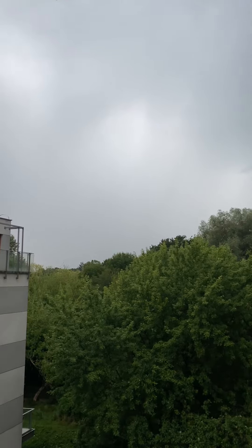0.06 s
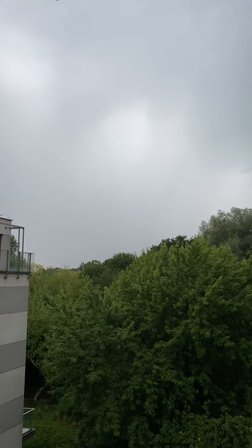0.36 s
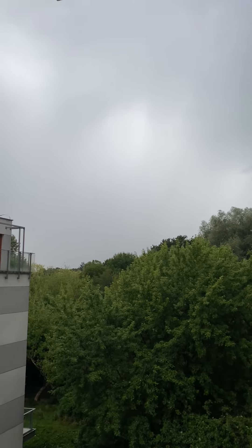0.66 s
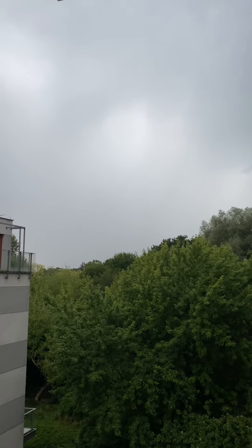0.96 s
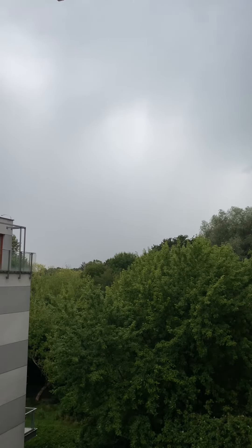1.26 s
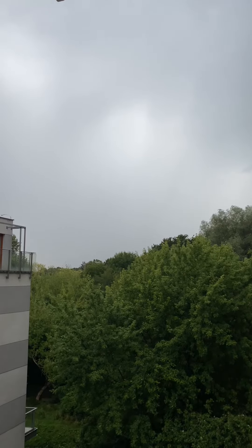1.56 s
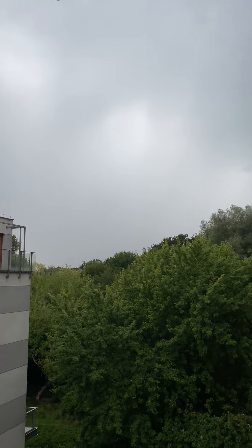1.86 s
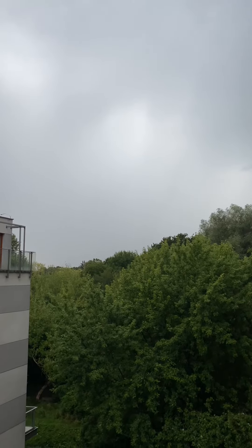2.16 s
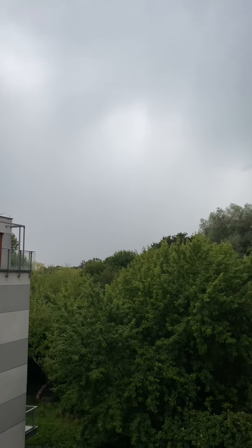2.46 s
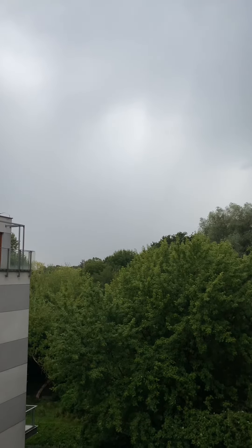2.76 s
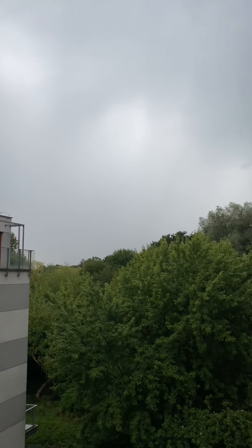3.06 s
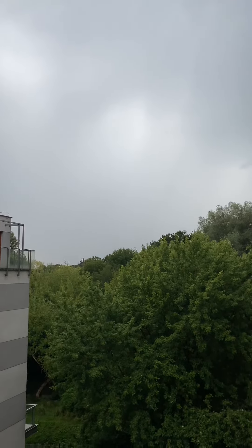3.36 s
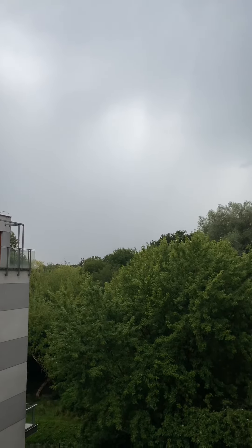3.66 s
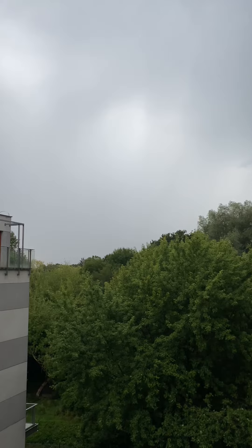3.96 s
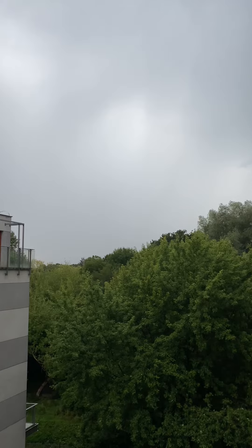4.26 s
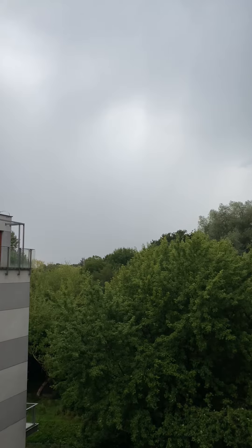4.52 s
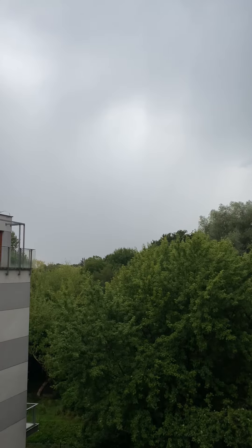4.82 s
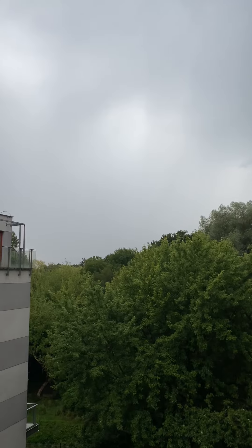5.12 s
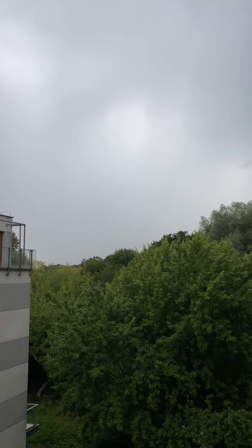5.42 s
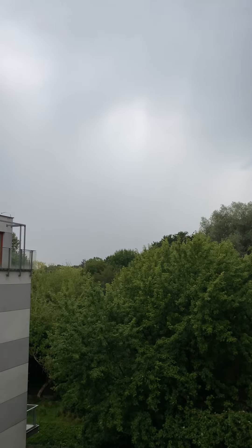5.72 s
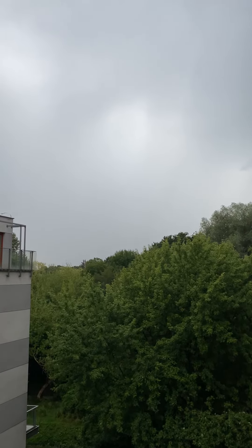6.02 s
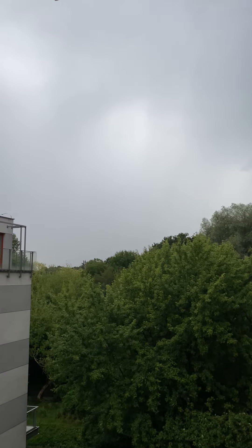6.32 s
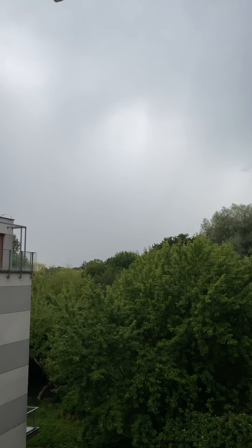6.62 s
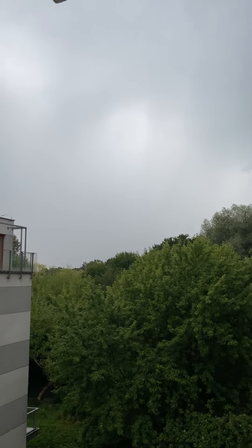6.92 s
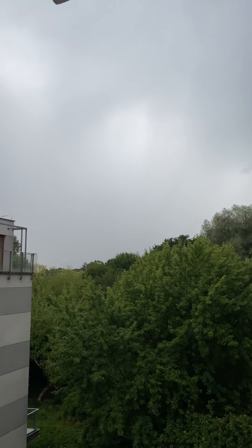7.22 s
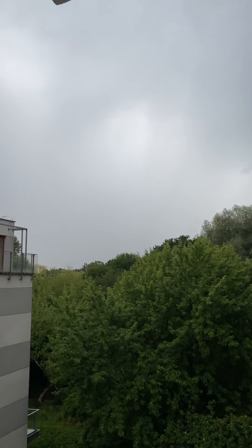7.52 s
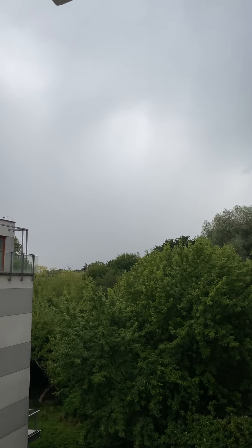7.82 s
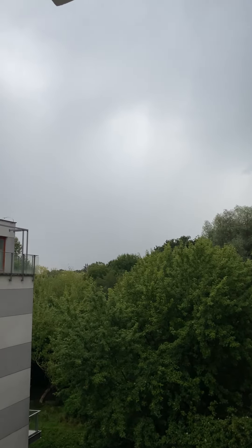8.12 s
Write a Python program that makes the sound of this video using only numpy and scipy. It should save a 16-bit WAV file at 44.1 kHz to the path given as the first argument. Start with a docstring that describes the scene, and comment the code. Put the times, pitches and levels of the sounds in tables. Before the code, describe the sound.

Thunder begins with a tearing crackle and builds in uneven claps to a loud, booming peal. It sinks to a low rumble, then swells again with duller booms. Light rain hisses steadily in the trees underneath, with a few faint drops ticking close by and one dry click just after the peak. The sound is heard outdoors from a balcony over a garden.

```python
"""A balcony over a garden, with thunder rolling through light rain.
Shock fronts from a long, crooked lightning channel arrive in order of distance: a tearing crackle,
then the main peal, then dull booms from the far branches, whose treble the air has absorbed.
Countless drops hiss in the trees, a few tick close by, wet leaves rustle and one dry click sounds.
The walls scatter the distant sound differently to the left and to the right."""
import sys
import numpy as np
from scipy import signal
from scipy.fft import rfft, irfft, next_fast_len
from scipy.io import wavfile
from scipy.ndimage import uniform_filter1d, minimum_filter1d

SR = 44100
rng = np.random.default_rng(int(sys.argv[2]) if len(sys.argv) > 2 else 0)


def waveform_to_disk(signal):
    """Save audio, clipped to [-1, 1], as 16-bit WAV at the path in sys.argv[1]."""
    frames = np.transpose(np.atleast_2d(signal))
    scaled = np.clip(frames, -1, 1) * 32767
    samples = np.round(scaled).astype(np.int16)
    wavfile.write(sys.argv[1], SR, samples)


N = 360738

# one peal per limb of the channel: start_s, rise_s, level_db, fade_db_per_s, bass_db, sharpness_db
PEALS = [(0.07, .15, -46.5, 3.5, 13.5, 7.5), (0.62, 0.064, -36.5, 5.5, -1.5, -4.5),
         (0.87, 0.043, -41, 8.5, 10.5, -2), (0.98, 0.19, -25, 4.5, -1, 2),
         (1.33, 0.092, -23.5, 18.5, -5, -1.5), (1.61, 0.13, -25, 50, -13, -7.5),
         (2.0, 0.072, -25.5, 31.5, -5.5, -0.5), (2.28, 0.087, -26.5, 9.5, 4, -1.5),
         (2.721, 0.075, -20, 13.5, -3, 2), (2.838, 0.11, -18.5, 23, -1, 4.5),
         (3.03, 0.058, -12, 52.5, -3, 7.5), (3.221, 0.14, -20, 31.5, 2, -8.5),
         (3.41, 0.028, -25, 18.5, -14.5, -6), (3.529, 0.038, -19.5, 14, -4.5, -1.5),
         (4.419, 0.15, -22.5, 9, -0.5, -5), (4.849, 0.15, -28.5, 45.5, 15, 8),
         (5.62, 0.094, -34, -2, -6, -6.5), (6.305, 0.021, -31.5, 11.5, 3.5, -4.5),
         (6.51, .04, -34.5, -4, -3, -0.5), (6.7, 0.15, -39.5, 25, 12, -13),
         (7.1, 0.21, -23.5, 11.5, 2, -10), (7.25, 0.18, -35.5, 12, 8, 12),
         (7.52, 0.13, -16.5, 24, -4, -0.5)]
# stretches of channel heard all at once: start_s, level_db, pitch_hz, length_s
CLAPS = [(0.118, -24, 398, 0.03), (0.237, -25, 283, 0.015), (0.326, -34.5, 332, 0.01),
         (0.35, -24, 310, 0.011), (0.389, -24, 380, 0.014), (0.491, -22.5, 312, 0.011),
         (0.690, -18, 366, 0.015), (0.726, -14.5, 348, 0.013), (0.789, -21, 336, 0.013),
         (0.88, -27.5, 438, 0.04), (0.918, -19.5, 378.5, 0.031), (0.938, -21, 405, 0.015),
         (0.991, -22.5, 437, 0.025), (1.076, -14, 234, 0.058), (1.386, -11.5, 352, 0.025),
         (1.404, -6.5, 294, 0.018), (1.433, -7.5, 253, 0.0074), (1.497, -11, 340, 0.018),
         (1.633, -2.5, 275, 0.012), (1.657, -5.5, 276, 0.021), (1.67, -17.5, 320, 0.016),
         (2.027, -11, 332, 0.03), (2.103, -12.5, 372, 0.019), (2.435, -18, 398, 0.017),
         (2.601, -19.5, 404, 0.012), (2.641, -12.5, 276.7, 0.031), (2.764, -15, 308, 0.022),
         (2.858, -7, 358, 0.02), (2.954, -5.5, 411, 0.022), (2.982, -4, 378, 0.03),
         (3.05, -4.5, 387, 0.011), (3.076, -1.5, 366, 0.017), (3.1, -5.5, 355, 0.03),
         (3.129, -2.5, 366, 0.027), (3.155, -11.5, 417, 0.017), (3.257, -5, 342.5, 0.014),
         (3.306, -9.5, 346, 0.012), (3.342, -7.5, 330, 0.037), (3.389, 4.5, 294.5, 0.016),
         (3.445, -6, 259, 0.0086), (3.516, -10, 250, 0.02), (3.613, -10.5, 321, 0.048),
         (3.933, -14.5, 424, 0.025), (4.02, -15.5, 342, 0.032), (4.403, -25, 335, 0.02),
         (4.444, -5.5, 139, 0.024), (4.544, -8.5, 140, 0.018), (6.384, -24.5, 367, 0.025),
         (7.205, -17.5, 295, 0.015), (7.372, -15.5, 235, 0.015), (7.424, -17.5, 242, 0.0096),
         (7.588, -12.5, 255, 0.05), (7.649, -6, 280, 0.013), (7.688, -4, 294, 0.0058),
         (7.878, -9.5, 248, 0.017), (7.951, -20, 378, 0.033), (8.139, -15.5, 238, 0.015)]
# bunches of steep fronts: crest_s, level_db, pitch_hz, width_octaves, length_s
CRACKS = [(0.122, -39.5, 1090, 1.3, 0.0091), (0.470, -41, 990, 1, .006), (0.555, -45, 1500, 1.4, 0.0055),
          (0.693, -37, 1400, 1.4, .006), (0.71, -32, 1000, 1.3, 0.0048), (0.734, -34, 990, 1, .007),
          (0.8, -44, 810, 1, .008), (0.901, -36, 1700, .8, 0.0099), (0.92, -30, 1450, .8, .008),
          (0.946, -35, 2100, 0.85, .005), (1.007, -37, 1900, .9, .008), (1.326, -24, 870, 1, 0.0065),
          (1.396, -22, 730, 0.8, .006), (1.408, -27.5, 1190, 1.4, 0.011), (1.426, -22.5, 1190, 0.58, .006),
          (1.456, -29.5, 1116, 0.36, 0.0036), (1.491, -20.5, 830, 0.66, 0.0071),
          (1.663, -26.5, 927, 1.4, .006), (1.677, -17, 740, 0.56, 0.006), (2.04, -33, 1076, 1.34, .009),
          (2.121, -28.5, 1150, 1, .006), (2.449, -31, 734, .9, .007), (2.554, -32, 800, 1.3, 0.0055),
          (2.71, -30.5, 1164, 0.81, 0.0064), (2.882, -25.5, 887, 0.9, 0.013),
          (2.974, -26.5, 1396, 0.71, .008), (2.990, -37.5, 2900, 1, .008), (3.076, -25.5, 1660, 0.96, .007),
          (3.137, -26, 2310, .6, .014), (3.134, -14, 843, 1.18, .007), (3.142, -25, 1020, 1.5, 0.0081),
          (3.276, -34.5, 1096, 1.7, 0.014), (3.302, -33.5, 1156, 1.4, 0.0033),
          (3.381, -32.5, 1395, 1, 0.0048), (3.396, -26, 1140, 1.9, .009), (3.619, -22.5, 677, .6, .007),
          (3.643, -32, 830, 0.68, 0.019), (4.029, -35, 910, 1, .012), (5.088, -37, 700, .6, .007),
          (7.392, -37.5, 720, .8, 0.016), (7.666, -31, 790, 0.93, 0.009), (7.697, -33, 840, 0.62, .016),
          (7.962, -29.5, 720, 0.81, .009)]
# the longest fronts: crest_s, level_db, pitch_hz
THUMPS = [(0.939, -22.5, 109), (1.098, -18.5, 88), (1.444, -13.5, 78.5), (1.672, -18, 70.4),
          (2.119, -17.5, 110.6), (2.99, -8, 94), (3.394, -2.5, 149), (3.65, -6.5, 103.5), (4.964, -20, 111),
          (7.302, -12.5, 95), (7.356, -14, 68.4), (7.896, -9, 118)]
# spectrum of a shock front after the air and the house wall: frequency_hz, gain_db
SHOCK_SPECTRUM = [(22, -23), (36, -5.5), (54, 4), (105, 5), (180, 1.5), (280, 0.64), (395, -0.5), (470, -7),
                  (620, -6.5), (880, -10), (1850, -20.5), (2600, -24.5), (3200, -36), (8000, -93)]
# how far each frequency follows brightness, bass and sharpness: frequency_hz, weight
AIR_WEIGHT = [(300, 0.15), (450, 0.27), (650, 0.69), (1000, 0.93), (1800, 1.36), (2800, 1.72), (4200, 1.9)]
BASS_WEIGHT = [(90, 0.91), (135, 0.075)]
SHARPNESS_WEIGHT = [(90, -0.41), (135, -0.33), (205, -1.1), (255, 1), (310, 0.51), (420, 0.74), (800, 0.11)]
# rain in the trees: frequency_hz, gain_db
RAIN_SPECTRUM = [(25, -22), (44, 5), (60, 9.5), (150, 7.5), (350, -6.5), (520, -8.5), (1000, -9.5),
                 (1900, -17), (2600, -18), (3300, -22), (4500, -29), (5800, -29.5), (7500, -43.5),
                 (11500, -37.5), (15500, -71)]
# the rain eases slightly, then picks up: time_s, level_db
RAIN_STRENGTH = [(0, -0.2), (2.5, 0), (4.1, -1.4), (5.4, -0.8), (5.9, 0), (8.1, 0.9)]
# near drops: start_s, click_db, spray_db, ring_hz, width_hz, decay_s, left_minus_right_db
DROPS = [(2.099, -47, -47, 5170, 3400, .006, 3), (2.219, -60, -42.5, 3700, 1100, 0.0079, -1),
         (3.231, -44, -50, 10000, 7500, 0.014, 4.5), (3.232, -70, -57, 9700, 140, 0.014, 3),
         (3.343, -64, -43, 4000, 560, 0.008, 5), (4.689, -41, -54, 12600, 9000, 0.011, -5),
         (5.791, -43, -48, 12100, 8500, .006, 1)]
# the click of a drop's first contact: frequency_hz, gain_db
CLICK_SPECTRUM = [(1500, -17), (5000, -6), (9000, 4), (14000, 4), (16000, -1)]
# mild resonances of the balcony: centre_hz, width_hz, gain_db
BALCONY_MODES = [(217, 7.2, 2), (348, 30, 2), (597, 14, 1), (840, 67, 1.5), (2310, 240, 0.7)]
# wall scatter relative to the direct sound: frequency_hz, level_db
WALL_SCATTER = [(35, -37), (85, -45), (180, -26.5), (340, -24), (520, -7.5), (1100, -12), (2200, -4.5),
                (4500, -13.5), (10000, 2)]
# phase lead of the left side over the right: frequency_hz, phase_rad
LEFT_LEAD = [(300, 0), (700, 0.41), (1100, 0.83), (1600, 0), (3000, 1.63), (5000, 1), (7000, 2.87)]
# difference in colour between the sides: frequency_hz, left_minus_right_db
BALANCE = [(250, -.3), (430, -2), (620, .4), (1150, 3.4), (1600, .9), (2200, 2.6), (3200, .5), (9000, -.5)]


def roll(fronts_per_s=3600, clump_db=0.24, clump_hz=36, evenness=0.043, patch_db=0.44):
    """Superposition: thousands of shock fronts a second merge into a rumble that swells in peals."""
    fronts = impacts(fronts_per_s, spread_db=3, size=N, largest=1.94)
    fronts = unit_rms(fronts * gain_of(-clump_db * wander(clump_hz)))
    hz, t, spectrum = signal.stft(fronts, SR, nperseg=1024, noverlap=768)
    bass_share = 1 / (1 + (hz[:, None] / 500) ** 2)
    # long fronts overlap, evening out the bass a little
    power = smooth_spectrogram(abs(spectrum) ** 2, frames=20, bins=3)
    spectrum *= (power.mean() / (power + 1e-12)) ** (evenness * bass_share)
    # higher up, interference favours a few pitches at a time
    patches = unit_rms(smooth_spectrogram(rng.standard_normal(spectrum.shape), frames=6, bins=5))
    spectrum *= gain_of(patch_db * patches * (1.5 - bass_share))
    arriving = signal.istft(spectrum * peals_gain(hz, t), nperseg=1024, noverlap=768)[1][:N]
    return coloured(arriving, shock_db) / band_rms(coloured(fronts, shock_db), 110, 450)


def peals_gain(hz, t):
    """Incoherent addition: the peals, each swelling and fading in its own colour, sum in power."""
    power = 0
    for start_s, rise_s, level_db, fade_db_per_s, bass_db, sharpness_db in PEALS:
        rise = np.clip((t - start_s) / rise_s, 0, 1)
        fade_db = fade_db_per_s * np.maximum(t - start_s - rise_s, 0)
        colour = gain_of(bass_db * curve(BASS_WEIGHT, hz) + sharpness_db * curve(SHARPNESS_WEIGHT, hz))
        power = power + np.outer(colour, rise * gain_of(level_db - fade_db)) ** 2
    return np.sqrt(power) * gain_of(np.outer(curve(AIR_WEIGHT, hz), brightness_db(t)))


def claps(gain_db=-9.5, jitter=0.16, kink_count=14, echo_db=-14, echo_s=0.022, size=8000):
    """Repetition pitch: a zigzag's kinks send a nearly even train of strong fronts amid small ones."""
    out, t = np.zeros(N), np.arange(size) / SR
    for start_s, level_db, pitch_hz, length_s in CLAPS:
        crackle = impacts(per_s=2700, spread_db=3, size=size)
        gaps_s = abs(1 + jitter * rng.standard_normal(kink_count)) / pitch_hz
        arrivals = ((np.cumsum(gaps_s) - gaps_s[0]) * SR).astype(int)
        kinks = np.bincount(arrivals, minlength=size)[:size]
        strong = 4.4 * signal.lfilter(*signal.butter(1, 1000, fs=SR), kinks)
        # long, rounded fronts boom lower and sound duller
        octaves_down = np.log2(330 / pitch_hz)
        dull_db = 13 * octaves_down + 1 - brightness_db(start_s)
        strong[0] += 3 * gain_of(-max(dull_db, 0))  # the first front snaps unless rounded off

        def colour_db(hz):
            """Wave shape sets timbre: rounded fronts boom, the deepest with a hollow knock."""
            boom_db = 0.21 * max(dull_db, 0) + 7 * max(octaves_down, 0)
            boom = boom_db * bell(np.log2((hz + 1) / pitch_hz), 0, 0.45)
            knock = 10 * max(octaves_down, 0) * bell(hz, 690, 170)
            hollow = 6 * max(octaves_down - 0.5, 0) * bell(hz, 300, 90)
            # the loudest claps carry a crackling edge near 4 kHz
            edge = np.clip(1.5 * (level_db + 7), 0, 9) * bell(hz, 4000, 600)
            air_loss = dull_db * curve(AIR_WEIGHT, hz)
            bass_loss = 6 * curve(BASS_WEIGHT, hz)  # a short stretch radiates little deep bass
            return shock_db(hz) + boom + knock + edge - hollow - air_loss - bass_loss

        envelope = np.exp(-(t / length_s) ** 4)
        tail = gain_of(echo_db) * np.exp(-t / echo_s)  # reflected by trees and houses
        fronts = strong * envelope + crackle * np.maximum(envelope, tail)
        clap = unit_rms(coloured(fronts, colour_db)) * np.sqrt(length_s * SR / size)
        fullness_db = 0.13 * dull_db  # rounded fronts carry more energy for their peak
        add(out, start_s, gain_of(level_db + gain_db + fullness_db) * clap)
    return out


def cracks(absorption_hz=2900, echo_db=-14, echo_s=0.022, size=4000):
    """Coincident arrival: steep fronts from short kinks land together, and a faint echo follows."""
    out, t = np.zeros(N), np.arange(size) / SR
    for crest_s, level_db, pitch_hz, width_octaves, length_s in CRACKS:
        since_crest = t - 2 * length_s
        burst = np.exp(-2 * (since_crest / length_s) ** 2)
        tail = (since_crest > 0) * gain_of(echo_db) * np.exp(-abs(since_crest) / echo_s)

        def colour_db(hz):
            """Kink length sets the pitch and its variety the bandwidth; absorption takes the treble."""
            band_db = -10 * (np.log2((hz + 1) / pitch_hz) / width_octaves) ** 2
            return band_db - 10 * np.log10(1 + (hz / absorption_hz) ** 10)

        fronts = impacts(per_s=2200, spread_db=2.5, size=size) * np.maximum(burst, tail)
        crack = unit_rms(coloured(fronts, colour_db)) * np.sqrt(length_s * SR / size)
        add(out, crest_s - 2 * length_s, gain_of(level_db) * crack)
    return out


def thumps(gain_db=-1, width_cycles=1.1, half_size=4000):
    """Wave packets: the longest fronts arrive as a few slow swings of pressure."""
    out, t = np.zeros(N), np.arange(-half_size, half_size) / SR
    for crest_s, level_db, pitch_hz in THUMPS:
        swing = np.sin(2 * np.pi * (pitch_hz * t + rng.random()))
        envelope = bell(t, 0, width_cycles / pitch_hz)
        add(out, crest_s + t[0], gain_of(level_db + gain_db) * envelope * swing)
    return out


def brightness_db(arrival_s, dulling_db_per_s=4):
    """Atmospheric absorption: later sound has crossed more air and keeps less treble, down to a floor."""
    return np.maximum(8.5 - dulling_db_per_s * arrival_s, -13)


def shock_db(hz, echo_gain=0.067, echo_s=0.0143):
    """Comb filtering: the back wall's echo ripples a front's spectrum; balcony modes add mild peaks."""
    modes_db = sum(db * bell(hz, centre_hz, width_hz) for centre_hz, width_hz, db in BALCONY_MODES)
    echo = echo_gain * np.exp(-hz / 900 - 2j * np.pi * hz * echo_s)
    return curve(SHOCK_SPECTRUM, hz) + modes_db + 20 * np.log10(abs(1 + echo))


def rain(level_db=-40, swell_db=0.06):
    """Shot noise: countless far drops on leaves merge into a wash over the storm's low murmur."""
    strength_db = np.interp(np.arange(N) / SR, *np.transpose(RAIN_STRENGTH))
    patter = impacts(per_s=14000, spread_db=2, size=N)
    patter *= gain_of(strength_db - swell_db * wander(rate_hz=3))
    return gain_of(level_db) * unit_rms(coloured(patter, lambda hz: curve(RAIN_SPECTRUM, hz)))


def drops(strike_s=0.00092, size=6000):
    """Impact excitation: a near drop clicks, then its spray rings the damped surface it lands on."""
    out, t = np.zeros((2, N)), np.arange(size) / SR
    click = coloured(signal.unit_impulse(size), lambda hz: curve(CLICK_SPECTRUM, hz))
    for start_s, click_db, spray_db, ring_hz, width_hz, decay_s, pan_db in DROPS:
        splash = rng.standard_normal(size) * (0.8 * np.exp(-t / strike_s) + np.exp(-t / decay_s))
        spray = coloured(splash, lambda hz: resonance_db(hz, ring_hz, width_hz))
        drop = gain_of(click_db) * click / abs(click).max()
        drop += gain_of(spray_db) * spray / abs(spray).max()
        add(out, start_s, pan_gains(pan_db) * drop)
    return out


def snap(start_s=3.877, level_db=-23, pan_db=-6.5, decay_s=0.00018):
    """A brief pulse has a broad spectrum: one dry click, very near."""
    out = np.zeros((2, N))
    pulse = np.exp(-np.arange(SR // 100) / SR / decay_s)
    add(out, start_s, gain_of(level_db) * pan_gains(pan_db) * pulse)
    return out


def wet_leaves(centre_s=5.78, half_length_s=0.18, level_db=-66, pitch_hz=4340, width_hz=1100):
    """Band-limited shot noise: wet leaves rustle for a moment in a crowd of tiny ticks."""
    ticks = impacts(per_s=1700, spread_db=-5, size=N)
    rustle = unit_rms(coloured(ticks, lambda hz: resonance_db(hz, pitch_hz, width_hz)))
    envelope = np.exp(-((np.arange(N) / SR - centre_s) / half_length_s) ** 4)
    return gain_of(level_db) * rustle * envelope


def storm():
    """Linear superposition of everything beyond the railing, drawn afresh at each call."""
    return roll() + claps() + cracks() + thumps() + rain() + wet_leaves()


def balcony(direct, scattered):
    """Decorrelation: wall scatter makes the two sides differ, and the left leads in phase."""
    size = next_fast_len(N + SR // 4)
    hz = np.fft.rfftfreq(size, 1 / SR)
    scatter, sides = gain_of(curve(WALL_SCATTER, hz)), np.array([[1], [-1]])
    stereo = (rfft(direct, size) + sides * scatter * rfft(scattered, size)) / np.sqrt(1 + scatter ** 2)
    stereo *= np.exp(0.5j * sides * curve(LEFT_LEAD, hz)) * pan_gains(curve(BALANCE, hz))
    return irfft(stereo, size)[:, :N]


def impacts(per_s, spread_db, size, largest=4):
    """Poisson process: random impulses of either sign and uneven height."""
    heights = gain_of(spread_db * np.minimum(rng.exponential(1, size), largest))
    return heights * rng.choice([-1, 1], size) * (rng.random(size) < per_s / SR)


def wander(rate_hz):
    """Low-pass noise: a slow fluctuation of rms 1."""
    hz = np.fft.rfftfreq(N, 1 / SR)
    return unit_rms(irfft(rfft(rng.standard_normal(N)) / (1 + (hz / rate_hz) ** 4), N))


def coloured(x, colour_db, size=4096):
    """Minimum-phase filter of gain colour_db(hz): onsets stay sharp and the ringing follows."""
    hz = abs(np.fft.fftfreq(size, 1 / SR))
    log_gain = np.log(gain_of(np.maximum(colour_db(hz), -100)))
    response = np.fft.ifft(np.exp(np.conj(signal.hilbert(log_gain)))).real
    return signal.oaconvolve(x, response)[:len(x)]


def resonance_db(hz, centre_hz, width_hz):
    """Lorentzian resonance peak."""
    return -20 * np.log10(1 + (2 * (hz - centre_hz) / width_hz) ** 2)


def bell(x, centre, width):
    """Gaussian curve of height 1."""
    return np.exp(-((x - centre) / width) ** 2)


def curve(points, hz):
    """Interpolation on a log-frequency axis."""
    points_hz, values = np.transpose(points)
    return np.interp(np.log(hz + 1), np.log(points_hz + 1), values)


def smooth_spectrogram(x, frames, bins):
    """Moving average over time, then frequency."""
    return uniform_filter1d(uniform_filter1d(x, frames, axis=1), bins, axis=0)


def band_rms(x, low_hz, high_hz):
    """Rms of one band, by Parseval's theorem."""
    hz = np.fft.rfftfreq(len(x), 1 / SR)
    return np.sqrt(2 * np.sum(abs(rfft(x)[(hz > low_hz) & (hz < high_hz)]) ** 2)) / len(x)


def unit_rms(x):
    """Normalisation to rms 1."""
    return x / np.sqrt(np.mean(x ** 2) + 1e-20)


def gain_of(db):
    """Decibels to amplitude."""
    return 10 ** (np.asarray(db) / 20)


def pan_gains(left_minus_right_db):
    """A level difference, split evenly between the sides."""
    return gain_of(np.array([[0.5], [-0.5]]) * left_minus_right_db)


def add(mix, start_s, sound):
    """Superposes a sound on the mix."""
    part = mix[..., max(round(start_s * SR), 0):][..., :sound.shape[-1]]
    part += sound[..., :part.shape[-1]]


def scene():
    """Direct and scattered sound of the storm, with the near drops and the click on top."""
    return balcony(direct=storm(), scattered=storm()) + drops() + snap()


def record(dry, ceiling=0.95, cutoff_hz=15800):
    """Peak limiting eases down the highest crests; a low-pass filter then limits the band."""
    allowed = np.minimum(ceiling / (abs(dry).max(0) + 1e-9), 1)
    held = minimum_filter1d(allowed, size=500)
    gain = uniform_filter1d(uniform_filter1d(held, size=250), size=250)
    lowpass = signal.firwin(511, cutoff_hz, window=("kaiser", 9), fs=SR)
    return signal.oaconvolve(dry * gain, lowpass[None], "same")


dry = scene()
out = record(dry)
waveform_to_disk(out)
```